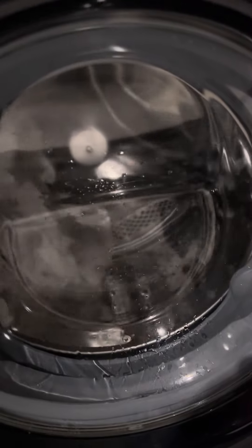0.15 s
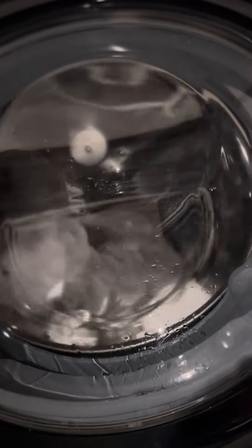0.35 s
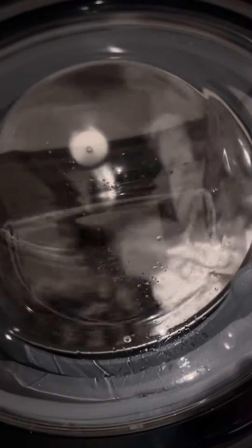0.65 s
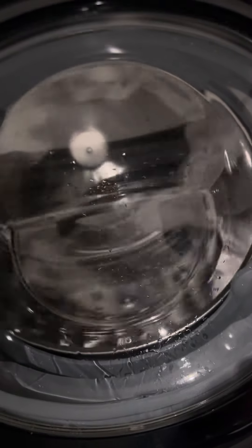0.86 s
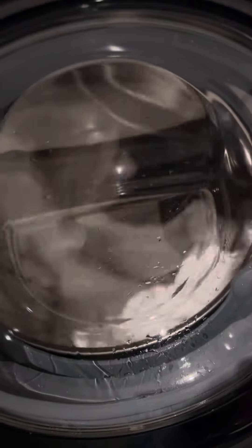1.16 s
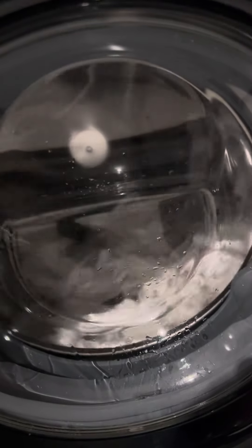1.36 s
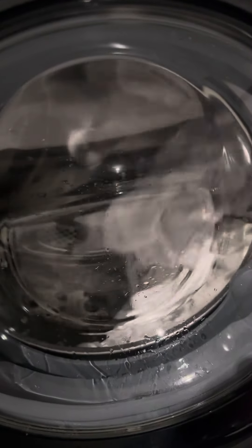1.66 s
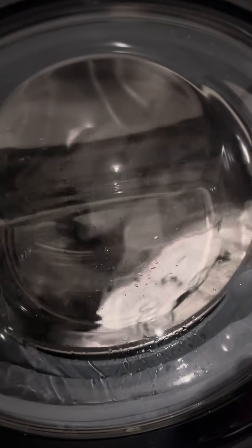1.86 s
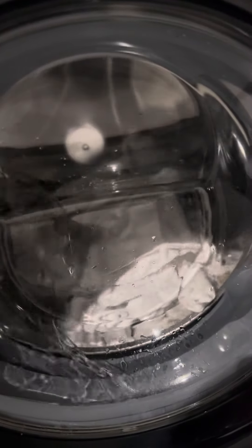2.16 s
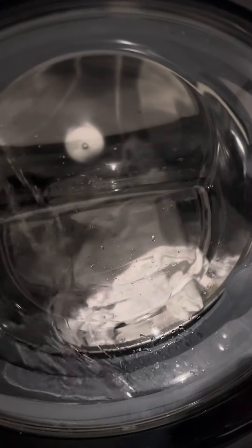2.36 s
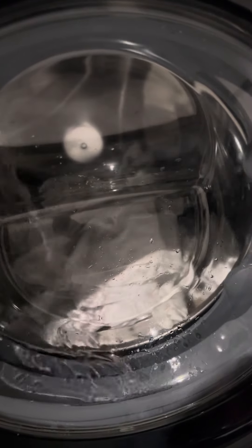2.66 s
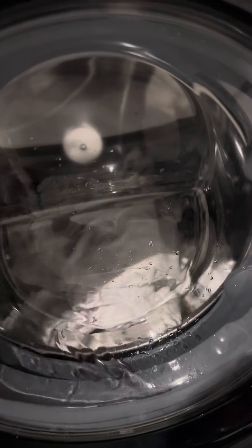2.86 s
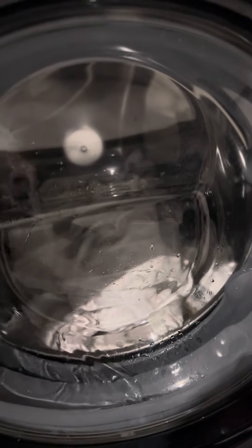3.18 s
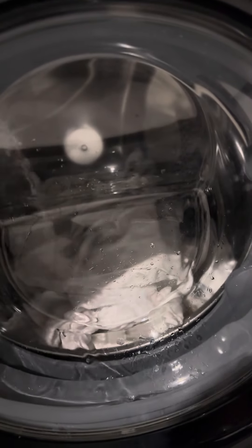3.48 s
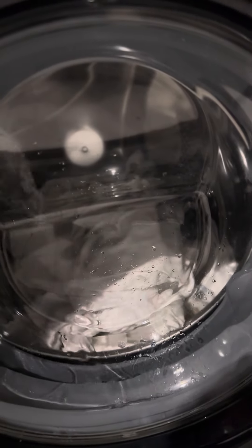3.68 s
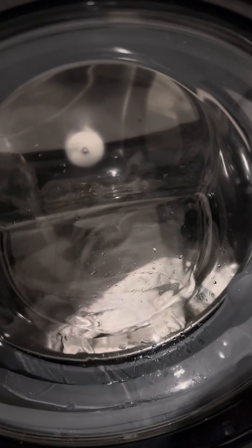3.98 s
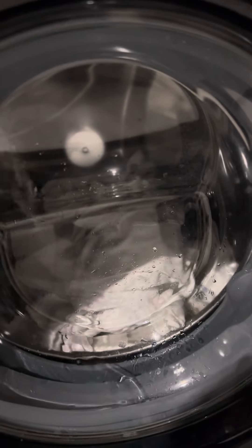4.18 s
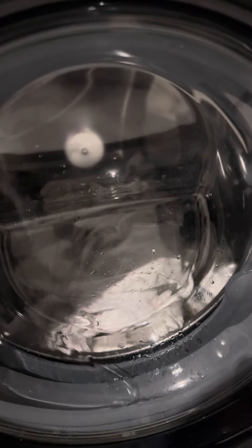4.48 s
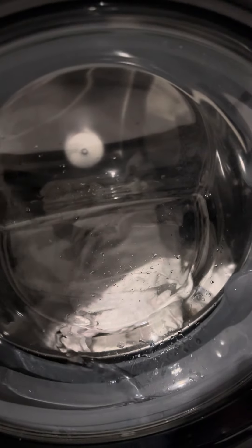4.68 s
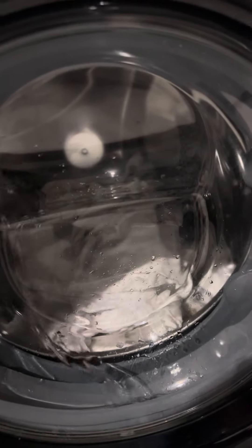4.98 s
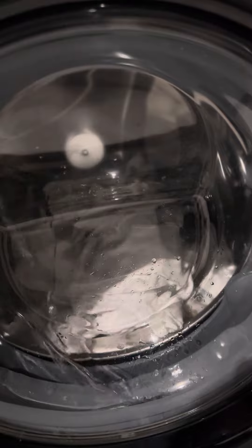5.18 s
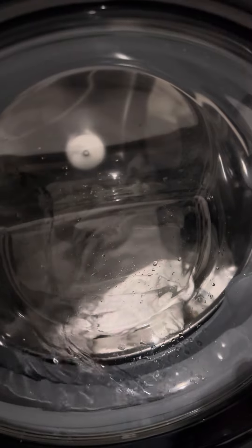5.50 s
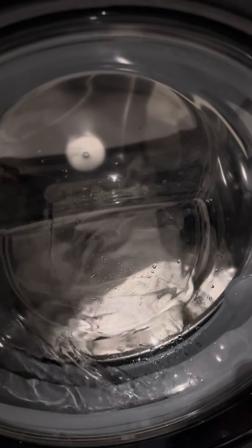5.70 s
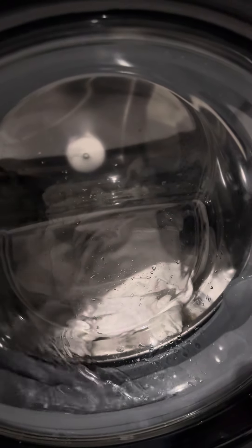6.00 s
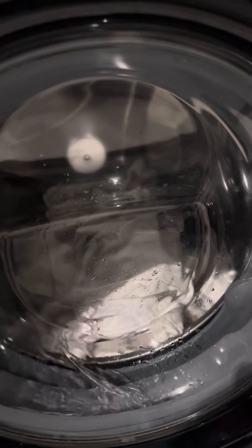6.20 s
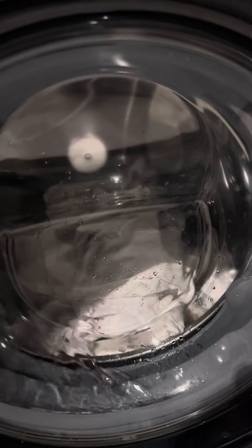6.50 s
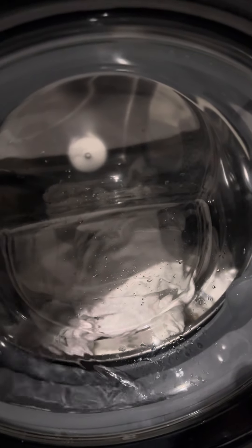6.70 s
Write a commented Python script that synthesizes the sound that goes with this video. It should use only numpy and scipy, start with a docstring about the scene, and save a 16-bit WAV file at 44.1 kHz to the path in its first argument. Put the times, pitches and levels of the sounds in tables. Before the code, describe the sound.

Water roars and hisses into a front-loading washer as wet laundry slaps, the valve clunks shut, then trickles and drips fade over a low hum.

```python
"""Water roars into a front-loading washing machine, heard close to its door, while a spray hisses on and off
and wet laundry falls. The valve shuts with a clunk; then water trickles and drips over a hum and a rumble.
Roar, spray, laundry and trickle are shaped noise. The clunk is a set of dying tones, and drips are short tones
that rise in pitch, with noisy splats. The hum is a wavering tone with noise around it."""
import sys
import numpy as np
from scipy import signal
from scipy.fft import rfft, irfft, next_fast_len
from scipy.io import wavfile
from scipy.ndimage import uniform_filter1d, map_coordinates

SR = 44100
rng = np.random.default_rng(int(sys.argv[2]) if len(sys.argv) > 2 else 0)


def pcm_store(signal):
    """Save signal as 16-bit PCM."""
    levels = np.round(np.clip(np.atleast_2d(signal), -1, 1) * 32767)
    wavfile.write(sys.argv[1], SR, levels.astype(np.int16).T)


N = 302085

# Levels that shape the roar noise: the part alike on both sides, and the part opposed between them.
# Each row: frequency in Hz, relative level in dB per Hz.
ROAR_SHARED = [(65, -20.5), (110, -7.5), (218, -5), (320, -4), (480, -10), (669, -12.5), (870, -15),
               (1030, -11), (1280, -16.5), (2000, -15), (2550, -13), (3300, -15.5), (3930, -16),
               (4350, -25), (4780, -25.5), (5050, -25.5), (5300, -24.5), (5890, -21), (9000, -32.5),
               (11700, -70), (19800, -120)]
ROAR_OPPOSED = [(65, -51), (110, -35), (210, -25), (324, -9.5), (534, -5.5), (699, -7.5), (776, -10),
                (1020, -2.5), (1540, -18.5), (2760, 0.5), (4010, -10), (4640, -9), (5950, -18.5),
                (10600, -20), (15800, -37)]
# Low resonances of tub and cabinet. Each row: frequency in Hz, width in Hz, relative level in dB.
TUB_MODES = [(323, 15, 1), (375, 18, -4), (570, 22, -9), (620, 20, -11), (740, 25, -11), (800, 25, -13),
             (945, 40, -16)]
# High resonances of hose and drawer. Each row: frequency in Hz, width in Hz, relative level in dB.
HOSE_MODES = [(1430, 40, -4), (1750, 70, -4), (2100, 40, -4), (2250, 40, -5), (2432, 35, -1), (2532, 40, 0),
              (2730, 50, -2), (2902, 30, -2), (3680, 40, -4), (3980, 40, -3), (4250, 40, -7),
              (4500, 50, -8), (4750, 90, -7)]
# The steady jet: level before its surges, time the valve shuts, and how fast the roar then dies.
ROAR_DB, SHUT_S, ROAR_FADE_DB_PER_S = -46, 2.896, 98
# The drawer's air column. Each row: time in seconds, lower resonance in dB (before its waver), upper one in dB.
AIR_COLUMN_LEVEL = [(0, -46.5, -48.5), (.15, -47, -56.5), (.3, -52, -86), (.65, -49, -59),
                    (.95, -52.5, -74), (1.3, -57, -74), (1.71, -60, -73), (1.76, -46, -79),
                    (1.85, -56.5, -74), (2.25, -61, -80), (2.4, -59, -67), (2.7, -59.5, -58),
                    (2.9, -49, -61.5)]
AIR_COLUMN_WAVER_DB = 1.5
# Deepest resonances of the tub. Each row: frequency in Hz, width in Hz, relative level in dB.
BOOM_MODES = [(159, 39, -1), (271, 43, -4)]
# Loudness of that boom before the valve shuts. Each row: time in seconds, level in dB.
BOOM_LEVEL = [(0, -53.5), (.5, -55), (.8, -62), (1.2, -62), (1.6, -57), (1.95, -53.5), (2.4, -52),
              (2.9, -52.5)]
# Levels that shape the spray noise: the part alike on both sides, and the part opposed between them.
# Each row: frequency in Hz, relative level in dB per Hz.
SPRAY_SHARED = [(3000, -13), (4750, -2), (5050, -20), (5300, -6), (5840, -4.5), (9900, -5), (11000, -27),
                (13000, -108), (14000, -7), (16000, 5)]
SPRAY_OPPOSED = [(2940, -27), (5000, -5.5), (6290, -13.5), (8880, -10.5), (10700, -3.5), (11700, -4),
                 (15100, -2), (16000, -9)]
# Spurts of spray in the drawer. Each row: start in seconds, hold in seconds, level in dB.
SPURTS = [(0.111, 0.094, -40.5), (0.849, 0.15, -43.5), (1.468, 1.303, -44), (2.879, 0.018, -46)]
# A weak spray seeps under the spurts; each spurt has this attack and fade.
SEEP_DB, SPURT_ATTACK_S, SPURT_FADE_DB_PER_S = -63, 0.02, 251
# Colour of the room rumble. Each row: frequency in Hz, relative level in dB per Hz.
RUMBLE_COLOUR = [(13, -35), (22, -16.5), (34, -13), (44, 1), (65, 12), (95, -1.5), (120, -34.5),
                 (210, -120)]
# Loudness of rumble and hum, before their wavers. Each row: time in seconds, level in dB.
RUMBLE_LEVEL = [(0, -54), (.32, -47), (.7, -58.5), (1.45, -52.5), (2, -60), (2.35, -54.5), (2.75, -61),
                (2.99, -46), (3.2, -59), (3.7, -63), (4.4, -66), (5.05, -63.5), (5.25, -52.5), (5.4, -61),
                (5.9, -58.5), (6.3, -64), (6.5, -69.5), (6.85, -74)]
HUM_LEVEL = [(0, -51), (.7, -55.5), (1.25, -51.5), (1.9, -64), (2.6, -58), (2.99, -52), (3.2, -56),
             (3.65, -58), (4.25, -64), (4.38, -51.5), (4.63, -63.5), (4.75, -56), (5.4, -63.5), (5.7, -55),
             (6.15, -65.5), (6.32, -52.5), (6.5, -65), (6.7, -55.5)]
RUMBLE_WAVER_DB, HUM_WAVER_DB = 3, 2.5
# Levels that shape the steady hiss: the part alike on both sides, and the part opposed between them.
# Each row: frequency in Hz, relative level in dB per Hz.
HISS_SHARED = [(59, -29), (100, -4.5), (350, -24.5), (461, -29.5), (547, -18), (1150, -42.5), (6020, -43.5),
               (10000, -54.5), (16000, -104)]
HISS_OPPOSED = [(59, -38.5), (100, -0.5), (197, -16.5), (676, -13), (1680, -35.5), (3050, -34), (5900, -43),
                (12400, -41.5), (16000, -55)]
# How long drum and room ring on. Each row: frequency in Hz, time to fall by 60 dB in seconds.
DRUM_DECAY = [(200, 0.27), (2000, 0.16), (10000, 0.077)]
# Falls of wet laundry. Each row: start in seconds, level in dB, hold in seconds,
# time to fall by 60 dB in seconds, treble against body in dB.
SLAPS = [(0.549, -45, .035, .1, -22), (0.6, -49, .035, .1, -26), (1.134, -45, .028, .07, -9)]
SLAP_ATTACK_S = .006
# Jolts of the hose on the cabinet. Each row: time in seconds, strength in dB, brightness in dB an octave.
JOLTS = [(2.9203, -40, 1), (2.9299, -34, 6.5), (2.953, -34.5, 2), (2.9899, -38.5, 0), (3.038, -45.5, 2),
         (3.11, -50, -3), (3.18, -50.5, -6)]
# Ringing tones of the cabinet. Each row: frequency in Hz, relative level in dB, time to fall by 60 dB in seconds.
CABINET_MODES = [(84, -3, 0.21), (144.7, 9.5, 0.15), (193, -6, 0.11), (255, -12, 0.19), (311, -6, 0.15),
                 (470, -10, 0.039), (594, -39, 0.56)]
# Loudness of the run-off, before its lumps and wavers.
# Each row: time in seconds, then slosh, gurgle, bubbling and patter, each in dB.
TRICKLE_LEVEL = [(3.0, -42, -57, -63, -71), (3.3, -68, -67, -72, -81), (3.55, -72, -76, -84, -77.5),
                 (3.65, -64, -83, -70, -80), (3.92, -69.5, -74, -81, -76), (4.2, -72.5, -79, -90, -80),
                 (4.43, -73, -82, -80, -80), (4.65, -78, -75.5, -101, -91.5),
                 (5.28, -66.5, -82.5, -84, -100), (5.31, -73, -63, -81, -82), (5.44, -61, -63.5, -76, -94),
                 (5.47, -65, -71.5, -85, -90), (5.72, -66.5, -66, -89, -88), (6.0, -67.5, -73.5, -94, -95),
                 (6.17, -76, -100, -100, -100), (6.23, -70, -72, -94, -91), (6.4, -82, -86, -100, -105),
                 (6.85, -73.5, -99, -102, -102)]
# Colour of slosh and gurgle. Each row: frequency in Hz, relative level in dB per Hz.
RUNNEL_COLOUR = [(68, -28), (115, -1.5), (124, -2.5), (221, -7.5), (279, -7.5), (484, -18.5), (616, -11),
                 (900, -25), (1170, -59), (1980, -120)]
# Short rushes of run-off. Each row: time in seconds, slosh in dB, length in seconds, gurgle against slosh in dB.
GUSHES = [(3.72, -68, 0.069, -16), (4.223, -84, 0.058, 4), (4.558, -70, 0.098, -1),
          (4.993, -63.5, 0.091, -6), (5.203, -65, 0.058, -6.5), (6.287, -71.5, 0.083, -0.5),
          (6.49, -79, 0.035, 1.5), (6.596, -67, 0.041, -12), (6.674, -67, 0.037, -8)]
# Door glass and drum under a drop. Each row: frequency in Hz, width in Hz, relative level in dB.
GLASS_MODES = [(603, 190, 2), (1034, 320, 0), (1604, 330, 1.5), (2000, 300, 1), (2350, 250, 2),
               (2750, 450, 1), (3200, 300, 1), (4800, 900, -5), (7800, 1800, -2)]
# Thin high ring of the drawer under running water. Each row: frequency in Hz, width in Hz, relative level in dB.
TINKLE_MODES = [(4420, 150, -3), (4700, 500, -9), (4960, 170, 0)]
# Loudness of that ring, before its flicker. Each row: time in seconds, level in dB.
TINKLE_LEVEL = [(3.0, -75), (3.3, -85.5), (3.7, -85), (4.1, -84), (4.35, -91), (4.6, -100), (6.85, -110)]
# Single drips. Each row: time in seconds, tone level in dB, starting pitch in Hz,
# time to fall by 60 dB in seconds, splat against tone in dB (before TAP_DB).
DRIPS = [(3.036, -45.5, 1580, 0.019, -12), (3.1803, -55, 1510, .018, -14), (3.2314, -52, 1600, 0.024, -16),
         (3.261, -50, 1690, 0.022, -16), (3.2845, -47, 1630, 0.018, -14), (3.36, -56, 1550, .025, -14),
         (3.431, -55.5, 1480, 0.013, -4), (3.451, -63, 1560, 0.014, -8), (3.477, -50.5, 3120, 0.015, -2),
         (3.48, -58, 4700, 0.013, -8), (3.532, -58, 2780, 0.015, -5), (3.647, -59, 1540, .018, 4),
         (3.9894, -62, 4900, .014, -8), (4.059, -62, 4870, 0.025, 8), (4.2456, -54.5, 2990, 0.0091, 3.5),
         (4.3066, -61.5, 4740, 0.022, -8), (4.353, -60, 1540, 0.01, -8), (4.4185, -62, 1420, 0.012, -5),
         (4.49, -62, 1300, 0.0091, 2), (4.567, -64.5, 3600, 0.013, 0), (4.586, -53.5, 7470, 0.0078, -15),
         (4.603, -68, 1530, 0.016, -8), (4.859, -65, 2830, .015, -1), (4.8627, -64, 2470, 0.027, -5),
         (4.951, -63, 1220, .011, -6), (5.264, -66, 2130, .012, -2), (5.2978, -49, 2540, 0.0085, -3),
         (5.302, -56, 3200, 0.025, -10), (5.336, -47.5, 2100, 0.0093, -15), (5.364, -49, 1720, 0.012, -13),
         (5.352, -66, 5000, 0.011, -8), (5.437, -60, 2010, .01, -9), (5.497, -59, 2320, .009, 5),
         (5.519, -59, 1980, 0.0083, -4), (5.546, -64.5, 2080, .009, 9), (5.597, -65, 3950, 0.01, -10),
         (5.611, -55, 2410, 0.0076, -1), (5.621, -51, 1950, 0.01, 5), (5.627, -55.5, 7500, 0.0075, -12),
         (5.652, -56, 2180, 0.0083, -14), (5.6992, -49.5, 5640, 0.017, -1.5),
         (5.7147, -58, 2820, 0.01, -11), (5.739, -63, 2390, .016, -4), (5.779, -64, 2270, 0.0095, -9),
         (5.793, -52.5, 2350, 0.018, 4.5), (5.839, -63, 2360, .01, 4), (5.863, -57, 2270, 0.0081, 6),
         (5.882, -67, 6100, 0.011, -6), (5.915, -61, 1970, .009, -2), (5.9565, -58, 1960, 0.0083, 2),
         (5.995, -55, 3020, 0.0077, -6), (6.0193, -66, 3130, .01, -3), (6.058, -61, 2020, 0.009, 7.5),
         (6.068, -68, 6560, .01, -4), (6.0833, -65.5, 2240, 0.011, 2), (6.1873, -61, 2400, 0.047, -19),
         (6.231, -53.5, 2160, .011, -1.5), (6.264, -61, 1890, 0.013, 5), (6.292, -68, 2090, .012, -8),
         (6.38, -63, 1880, .014, -5), (6.3972, -55.5, 7930, 0.015, -17), (6.4518, -59.5, 2000, .01, 6.5),
         (6.5766, -64, 1770, .014, -11), (6.6273, -68, 1600, 0.011, 1), (6.684, -75, 3220, .02, -15)]
# Left against right, its random scatter, and the gain from splat to glass.
DRIP_PAN_DB, DRIP_SPREAD_DB, TAP_DB = 0, 0.5, 21.5
# Droplets thrown by a drip: mean delay, starting level against the drip, scatter of the log pitch.
SPATTER_S, SPATTER_DB, SPATTER_SPREAD = 0.036, -8.5, .35
# Colour of water spreading after a drip. Each row: frequency in Hz, relative level in dB per Hz.
WASH_COLOUR = [(900, -40), (1400, -20), (1850, -6), (2300, 0), (2800, -9), (3250, -7), (3700, -20),
               (5000, -26), (9000, -60)]
# Level of the spreading water against its drip, and how it swells and dies.
WASH_DB, WASH_RISE_S, WASH_T60_S = -19, .008, .38
# Larger drops. Each row: time in seconds, level in dB, starting pitch in Hz, time to fall by 60 dB in seconds.
PLOPS = [(3.395, -59.5, 304.5, 0.34), (4.06, -54.5, 590, 0.045), (4.122, -63, 760, 0.045),
         (4.357, -63, 790, 0.035), (3.325, -54, 625, 0.11), (3.635, -59, 986, 0.036),
         (3.667, -58, 1030, .04), (3.722, -58.5, 980, .04), (4.62, -61, 565, 0.077),
         (4.956, -60, 627, 0.08), (4.971, -51.5, 293, 0.15), (5.049, -70, 560, 0.042),
         (5.312, -49, 587, 0.068), (5.497, -63, 660, 0.12), (5.549, -64, 250, 0.14),
         (5.622, -50, 580, 0.053), (5.796, -35, 270, 0.025), (5.809, -39, 270, .035),
         (5.862, -53, 320, 0.068), (5.95, -66, 237, 0.16), (6.066, -59, 620, 0.093),
         (6.218, -58, 653, 0.042), (6.262, -58, 640, .07), (6.305, -61, 620, .06), (6.478, -64, 630, 0.065),
         (6.572, -65, 600, .05), (6.784, -71, 604, .05), (6.452, -68, 737, 0.13)]
TOP_HZ = 15950  # nothing is kept above this


def amp(db):
    """Turn decibels into a gain."""
    return 10 ** (np.asarray(db) / 20)


def unit(x):
    """Scale a sound to rms 1."""
    return x / np.sqrt(np.mean(x ** 2) + 1e-20)


def along(points, hz):
    """Read between (Hz, value) points on a log axis."""
    f, v = np.transpose(points)
    return np.interp(np.log(hz + 1), np.log(f + 1), v)


def curves(rows):
    """One value per sample for each column after the time."""
    s, *cols = np.transpose(rows)
    return [np.interp(np.arange(N) / SR, s, c) for c in cols]


def wobble(rate):
    """A smooth random curve, rate knots a second."""
    knots = rng.standard_normal(int(N * rate / SR) + 4)
    return map_coordinates(knots, [np.arange(N) * rate / SR])


def swells(rows):
    """Bell-shaped swells from rows of time, level and length."""
    t = np.arange(N) / SR
    return sum(amp(db) * np.exp(-(2 * (t - s) / length) ** 2) for s, db, length in rows)


def filtered(x, response):
    """Multiply the spectrum of x by a response of frequency."""
    m = next_fast_len(N + SR // 2)
    return irfft(rfft(x, m) * response(np.fft.rfftfreq(m, 1 / SR)), m)[..., :N]


def slope(points):
    """The gain of a spectrum table."""
    return lambda hz: amp(along(points, hz))


def band(lo_hz, hi_hz, order=4):
    """A band with steep skirts."""
    return lambda hz: ((1 + (lo_hz / (hz + 1)) ** (2 * order)) * (1 + (hz / hi_hz) ** (2 * order))) ** -.5


def peaks(modes):
    """The gain of resonances summed in power."""
    return lambda f: np.sqrt(sum(amp(2 * db) / (1 + (2 * (f - c) / w) ** 2) ** 2 for c, w, db in modes))


def drum(x):
    """The steel drum and room answer, each frequency dying at its own speed."""
    hz, t, z = signal.stft(rng.standard_normal((2, SR // 2)), SR, nperseg=256)
    decay = amp(-60 * t / along(DRUM_DECAY, hz)[:, None])
    tail = signal.istft(z * decay, SR, nperseg=256)[1]
    return signal.fftconvolve(x, tail / np.linalg.norm(tail[0]), axes=1)[:, :N]


def rush(shared, opposed, side_db, patchy_db=None, echo_db=None):
    """Stereo noise like rushing water; the shared part has rms 1, the opposed part side_db."""
    pair = rng.standard_normal((2, N))
    if patchy_db:  # turbulence comes in patches of random gain over time and pitch
        z = signal.stft(pair, nperseg=512)[2]
        field = uniform_filter1d(rng.standard_normal(z.shape[1:]), size=5, axis=0)
        field = uniform_filter1d(field, size=10, axis=1)
        pair = signal.istft(z * amp(patchy_db * unit(field)), nperseg=512)[1][:, :N]
    if echo_db:  # close walls comb a steady noise into many fixed fine peaks
        pair = pair + amp(echo_db) * drum(pair)
    middle = unit(filtered(pair[0], shared))
    side = amp(side_db) * unit(filtered(pair[1], opposed))
    return np.array([middle + side, middle - side])


def bubbles(s, db, hz, t60, pan_db, rise, span):
    """Damped tones whose pitch rises as they die."""
    t = np.arange(round(span * SR)) / SR
    life = t / np.clip(t60, .001, 1)[:, None]
    phase = 2 * np.pi * hz[:, None] * t * (1 + rise * np.minimum(life, 1))
    tone = amp(db[:, None] - 60 * life) * np.sin(phase)
    tone *= 1 - np.exp(-t * hz[:, None] / 0.75)  # a bubble starts softly, over a cycle or two
    at = (np.round(s * SR).astype(int)[:, None] + np.arange(len(t))).ravel()
    sides = [(tone * amp(half * pan_db)[:, None]).ravel() for half in (.5, -.5)]
    return np.array([np.bincount(at, side, N + len(t))[:N] for side in sides])


def shut_fade_db():
    """The flow's level falls steadily once the valve shuts."""
    return -ROAR_FADE_DB_PER_S * np.maximum(np.arange(N) / SR - SHUT_S, 0)


def inlet_roar():
    """The jet's broad, turbulent roar rings the resonances of tub and hose."""
    jet = rush(slope(ROAR_SHARED), slope(ROAR_OPPOSED), side_db=-2.5, patchy_db=1.14, echo_db=-11)
    tub = amp(-3.5) * rush(peaks(TUB_MODES), peaks(TUB_MODES), side_db=-16.5)
    hose = amp(-9.0) * rush(peaks(HOSE_MODES), peaks(HOSE_MODES), side_db=-9.5, patchy_db=2.0)
    surge_db = .8 * wobble(12) + .4 * wobble(5)
    return amp(shut_fade_db() + ROAR_DB + surge_db) * (jet + tub + hose)


def air_column():
    """The drawer's air column whoops at two resonances, swelling and sinking as noise in narrow bands."""
    lower_db, upper_db = curves(AIR_COLUMN_LEVEL)
    lower_db = lower_db + AIR_COLUMN_WAVER_DB * wobble(11.2)
    lower = amp(lower_db) * rush(peaks([(675.6, 97, 0)]), peaks([(698, 79, 0)]), side_db=-4.0)
    upper = amp(upper_db) * rush(peaks([(940, 120, 0)]), peaks([(955, 60, 0)]), side_db=-8)
    return amp(shut_fade_db()) * (lower + upper)


def tub_boom():
    """The deepest resonances of the tub boom while the water runs."""
    boom = rush(peaks(BOOM_MODES), peaks(BOOM_MODES), side_db=-19.5)
    return amp(shut_fade_db() + curves(BOOM_LEVEL)[0]) * boom


def spray():
    """Spurts of fine spray hiss in the drawer over a weak seep; much of it reaches the two sides in opposition."""
    t = np.arange(N) / SR
    level = amp(SEEP_DB + 2.0 * shut_fade_db())  # the seep dies twice as fast as the roar
    for s, hold, db in SPURTS:
        attack = np.clip((t - s) / SPURT_ATTACK_S, 0, 1)
        level = level + attack * amp(db - SPURT_FADE_DB_PER_S * np.maximum(t - s - hold, 0))
    noise = rush(slope(SPRAY_SHARED), slope(SPRAY_OPPOSED), side_db=-1.5, patchy_db=2.5)
    return level * amp(1.4 * wobble(31.0)) * noise


def rumble():
    """Room rumble: deep noise that wavers in level."""
    level_db = curves(RUMBLE_LEVEL)[0] + RUMBLE_WAVER_DB * wobble(5.9)
    return amp(level_db) * rush(slope(RUMBLE_COLOUR), slope(RUMBLE_COLOUR), side_db=-21.5)


def hum():
    """A hum at about twice the mains frequency comes and goes: an unsteady tone with noise around it."""
    tone = np.sin(2 * np.pi * 100.2 * np.arange(N) / SR + 1.0 * wobble(7.7))
    fuzz = rush(peaks([(103.0, 53.0, 0)]), peaks([(97.0, 30, 0)]), side_db=-19.0)
    level_db = curves(HUM_LEVEL)[0] + HUM_WAVER_DB * wobble(12)
    return amp(level_db) * (0.75 * tone + 0.7 * fuzz)


def hiss():
    """A faint steady background noise."""
    return amp(-70.5) * rush(slope(HISS_SHARED), slope(HISS_OPPOSED), side_db=-1.0)


def laundry():
    """Wet cloth drops in the turning drum: rough splashes that start hard, hold briefly and die away."""
    t = np.arange(N) / SR
    body_level, treble_level = np.zeros(N), np.zeros(N)
    for s, db, hold, t60, treble_db in SLAPS:
        attack = np.clip((t - s) / SLAP_ATTACK_S, 0, 1)
        shape = attack * amp(db - 60 * np.maximum(t - s - hold, 0) / t60)
        body_level += shape
        treble_level += amp(treble_db) * shape
    body, treble = band(1300, 3200, order=4), band(4300, 8800, order=5)
    rough = unit(amp(2.5 * wobble(150)))
    splash = body_level * rush(body, body, side_db=-10) + treble_level * rush(treble, treble, side_db=-4)
    return filtered(rough * splash, band(600, 9500, order=12))


def valve_clunk():
    """The stopped water jerks the hose; each jolt rings the cabinet, a brighter one its upper tones more."""
    out, t = np.zeros(N + SR), np.arange(SR // 2) / SR
    onset = 1 - np.exp(-t / 0.0015)
    for s, db, bright_db in JOLTS:
        ring = np.zeros(len(t))
        for hz, mode_db, t60 in CABINET_MODES:
            level_db = mode_db + bright_db * np.log2(hz / 138)
            ring += amp(level_db - 60 * t / t60) * np.sin(2 * np.pi * hz * t)
        out[round(s * SR):][:len(t)] += amp(db) * ring * onset
    return out[:N]


def run_off(level, colour, lo_hz, hi_hz, side_db, lumpy_db, rate, waver_db):
    """One layer of running water: noise in a band with fast lumps and a slower waver."""
    limits = band(lo_hz, hi_hz)
    response = lambda hz: colour(hz) * limits(hz)
    lumps = amp(lumpy_db * wobble(rate) + waver_db * wobble(13))
    return level * lumps * rush(response, response, side_db=side_db, patchy_db=2.5)


def trickle():
    """Water runs off drawer and glass: slosh, gurgle in the tub's hollow, grainy bubbling and patter, thin tinkle."""
    slosh, gurgle, bubbling, patter = amp(curves(TRICKLE_LEVEL))
    slosh = slosh + swells([(s, db, length) for s, db, length, _ in GUSHES])
    gurgle = gurgle + swells([(s, db + hollow_db, length) for s, db, length, hollow_db in GUSHES])
    runnel, glass = slope(RUNNEL_COLOUR), peaks(GLASS_MODES)
    out = run_off(slosh, runnel, 120, 298, side_db=-19.5, lumpy_db=2.0, rate=35.05, waver_db=1.1)
    out += run_off(gurgle, runnel, 420, 1170, side_db=-1.5, lumpy_db=2.4, rate=36.06, waver_db=1.3)
    out += run_off(bubbling, glass, 850, 1050, side_db=-9, lumpy_db=1.7, rate=92.0, waver_db=2.6)
    out += run_off(patter, glass, 2200, 4400, side_db=-3.5, lumpy_db=1.6, rate=148.7, waver_db=4.5)
    tinkle_db = curves(TINKLE_LEVEL)[0] + 4 * wobble(70) + 1.5 * wobble(12)  # ticks with gaps
    out += amp(tinkle_db) * rush(peaks(TINKLE_MODES), peaks(TINKLE_MODES), side_db=-3, patchy_db=3)
    emerge = np.clip((np.arange(N) / SR - TRICKLE_LEVEL[0][0]) / .08, 0, 1)  # as the roar dies
    return out * emerge


def patter_droplets():
    """Many tiny droplets at random times follow the patter's level, pitched near the resonances of the glass."""
    u, g = rng.random((900, 2)), rng.standard_normal((900, 2))
    start = TRICKLE_LEVEL[0][0]
    s = start + u[:, 0] * (N / SR - start)
    size_db = curves(TRICKLE_LEVEL)[3][(s * SR).astype(int)] + 4 - 1.8 * np.log(1 - u[:, 1])
    hz = rng.choice(np.transpose(GLASS_MODES)[0][1:-1], len(s)) * np.exp(0.12 * g[:, 0])
    return bubbles(s, size_db, hz, 25 / hz, 4 * g[:, 1], rise=0.13, span=.02)


def drips():
    """Each single drip is a short tone that rises in pitch as it dies."""
    s, db, hz, t60, _ = np.transpose(DRIPS)
    pan_db = DRIP_PAN_DB + DRIP_SPREAD_DB * rng.standard_normal(len(s))
    return bubbles(s, db, hz, t60, pan_db, rise=0.062, span=.04)


def spatter():
    """Each drip throws twelve droplets, on the whole weaker the later they land."""
    s, db, hz = np.transpose(DRIPS)[:3, :, None]
    late, small = rng.exponential(size=(2, len(s), 12))
    tune, side = rng.standard_normal((2, len(s), 12))
    thrown_hz = np.minimum(hz * np.exp(SPATTER_SPREAD * tune), 9000).ravel()
    thrown_s = (s + SPATTER_S * late).ravel()
    thrown_db = (db + SPATTER_DB - 4 * small - 5 * late).ravel()
    return bubbles(thrown_s, thrown_db, thrown_hz, 12 / thrown_hz, 3 * side.ravel(), rise=0.2, span=0.031)


def splats():
    """Each drip also taps glass and drum: a short, crackling puff of noise sets their resonances ringing."""
    s, db, _, _, splat_db = np.transpose(DRIPS)
    taps = np.zeros(N)
    taps[np.round(s * SR).astype(int)] = amp(db + splat_db + TAP_DB)
    puff = amp(-60 * np.arange(SR // 5) / SR / 0.053)
    crackle = unit(amp(5 * wobble(400)) * rng.standard_normal(N))
    noise = signal.fftconvolve(taps, puff / np.linalg.norm(puff))[:N] * crackle

    def glass_ring(f):
        """Resonances of alternating sign, with the treble softened."""
        ring = 0
        for k, (c, w, mode_db) in enumerate(GLASS_MODES):
            ring = ring + (-1) ** k * amp(mode_db) * 1j * f * w / (c * c - f * f + 1j * f * w)
        return ring / (1 + 1j * f / 3800) ** 3

    return filtered(noise, glass_ring)


def wash():
    """After each drip pitched below 3500 Hz the water spreads in a soft, grainy tail."""
    s, db, hz = np.transpose(DRIPS)[:3]
    power, t = np.zeros(N), np.arange(SR // 3) / SR
    power[np.round(s * SR).astype(int)] = amp(2 * (db + WASH_DB)) * (hz < 3500)
    tail = (1 - np.exp(-t / WASH_RISE_S)) * amp(-60 * t / WASH_T60_S)
    level = np.sqrt(np.abs(signal.fftconvolve(power, tail ** 2)[:N]))
    noise = rush(slope(WASH_COLOUR), slope(WASH_COLOUR), side_db=2.5, patchy_db=5.5)
    return level * unit(amp(4.1 * wobble(160)) * noise)


def plops():
    """Larger drops: lower tones that rise slightly as they die."""
    s, db, hz, t60 = np.transpose(PLOPS)
    return bubbles(s, db, hz, t60, 0 * s, rise=0.04, span=.2)


def scene():
    """Add up all the sounds; the drops also ring in the drum and room."""
    filling = inlet_roar() + air_column() + tub_boom() + spray()
    background = rumble() + hum() + hiss()
    drops = patter_droplets() + drips() + spatter() + splats() + plops()
    water_left = trickle() + wash() + drops + amp(-4.0) * drum(drops)
    return filling + background + laundry() + valve_clunk() + water_left


def record(dry):
    """The microphone rolls off the deepest bass and keeps nothing above its band limit."""
    bass = lambda hz: hz ** 2 / (hz ** 2 + 35 ** 2)
    return filtered(dry, lambda hz: bass(hz) * np.clip((TOP_HZ - hz) / 200, 0, 1) ** 2)


dry = scene()
out = record(dry)
pcm_store(out)
```